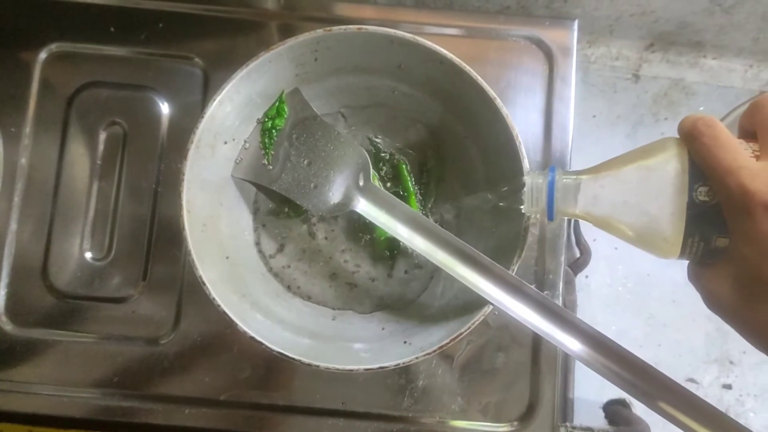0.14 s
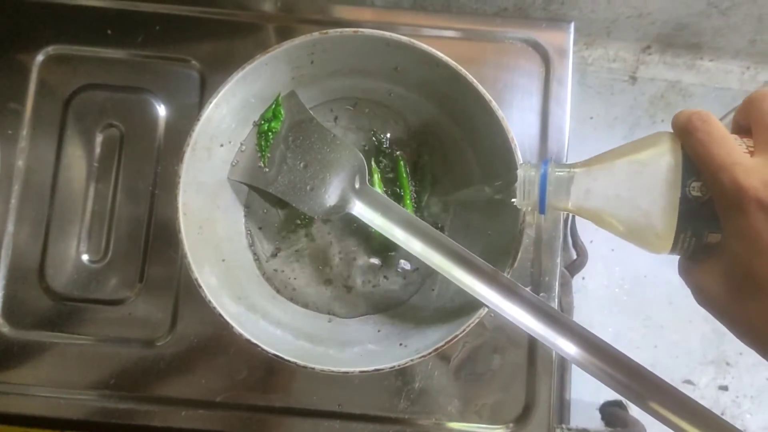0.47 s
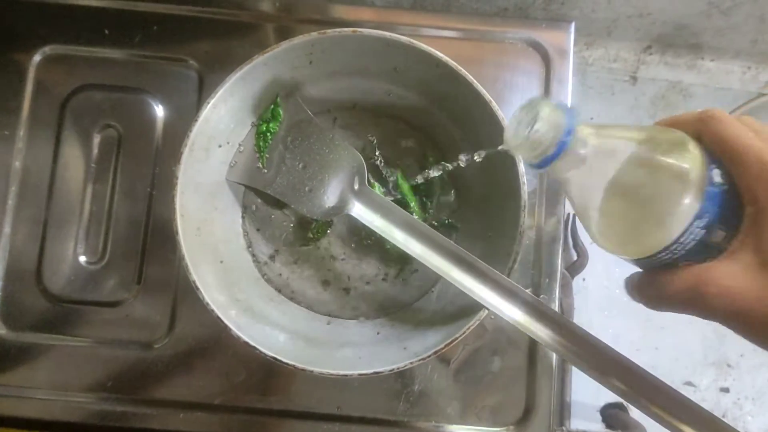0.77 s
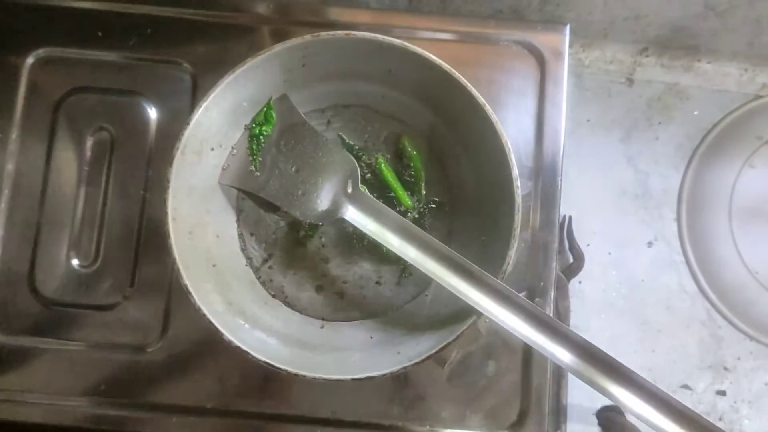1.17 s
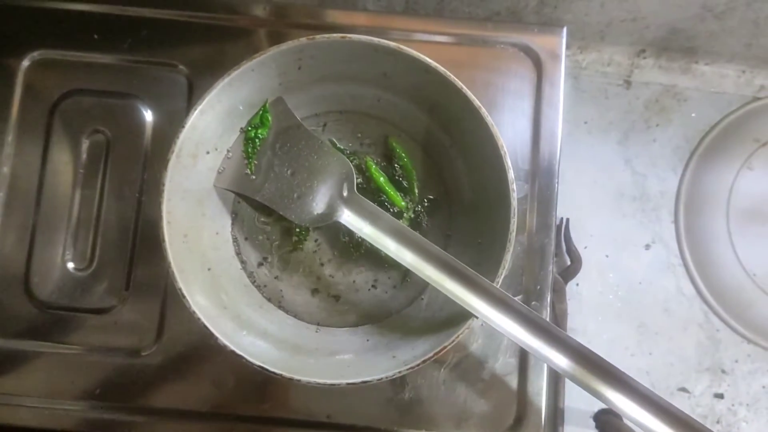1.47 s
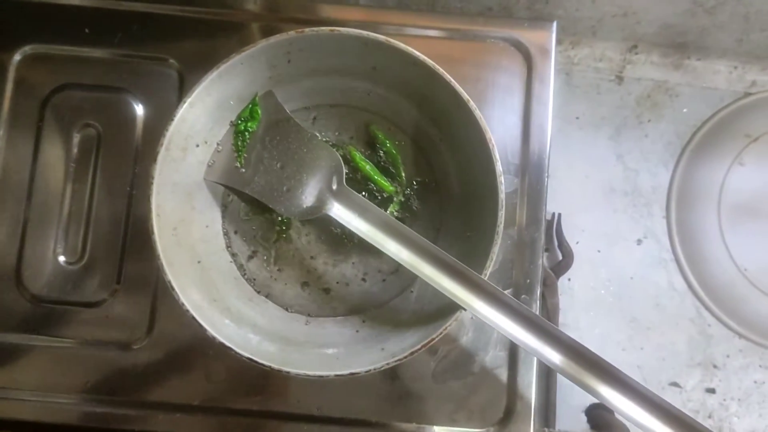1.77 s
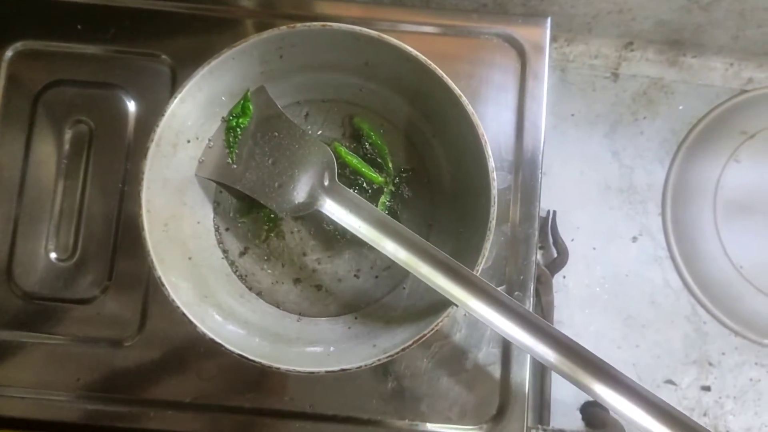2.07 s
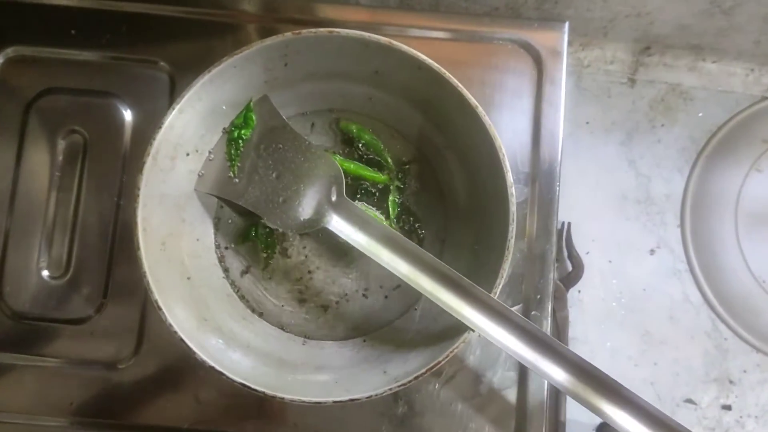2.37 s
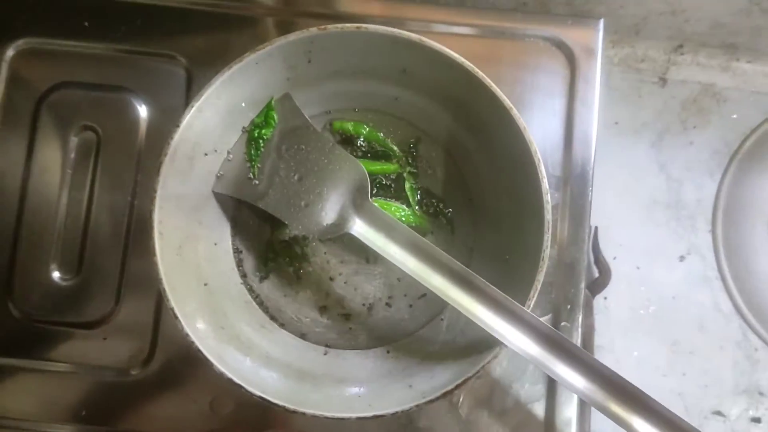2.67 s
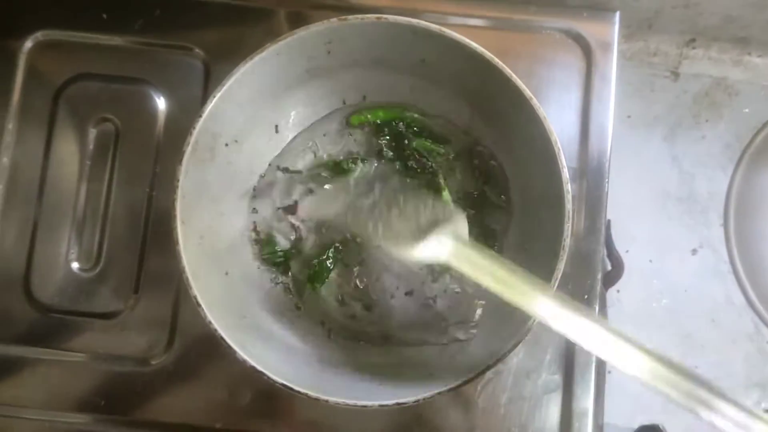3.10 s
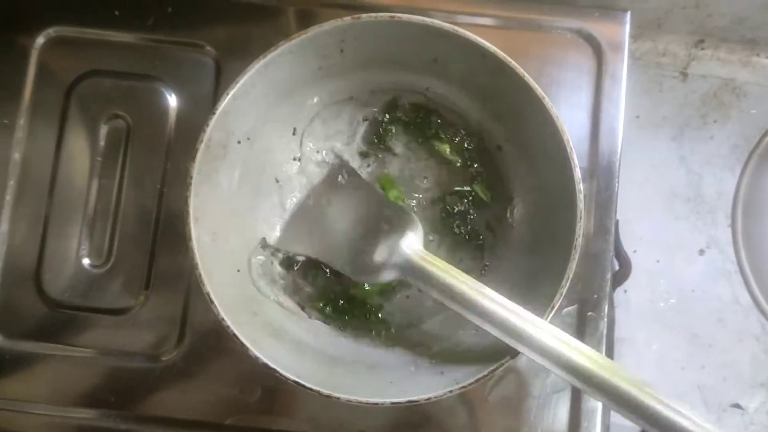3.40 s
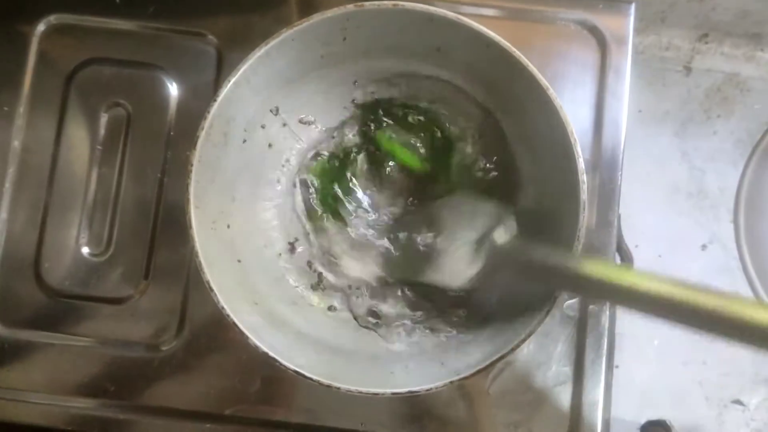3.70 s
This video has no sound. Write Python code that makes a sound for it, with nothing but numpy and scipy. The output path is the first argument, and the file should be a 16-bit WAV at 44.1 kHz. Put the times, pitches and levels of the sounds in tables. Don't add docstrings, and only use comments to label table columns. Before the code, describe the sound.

Hot oil sizzles and spits in a metal pan, calming before a spatula scrapes through it

```python
import sys
import numpy as np
from scipy import signal
from scipy.fft import rfft, irfft
from scipy.io import wavfile

SR = 44100
rng = np.random.default_rng(int(sys.argv[2]) if len(sys.argv) > 2 else 0)


def log_audio(samples):
    frames = np.atleast_2d(samples).T
    limited = np.clip(frames, -1, 1)
    pcm = np.round(limited * 32767).astype(np.int16)
    wavfile.write(sys.argv[1], SR, pcm)


def boost_factor(decibels):
    exponent = np.asarray(decibels, float) / 20
    return 10 ** exponent


N = 169785
BODY_LOW_HZ, BODY_HIGH_HZ = 844, 4346
GRID_HZ = np.fft.rfftfreq(4096, 1 / SR)


def at_hz(points, hz):
    p = np.array(points)
    return np.interp(np.log(hz + 1), np.log(p[:, 0]), p[:, 1])


def rms_one(x):
    return x / np.sqrt(np.mean(np.square(x)) + 1e-20)


def drift(rate_hz):
    r = np.exp(-2 * np.pi * rate_hz / SR)
    wander = signal.lfilter([1], [1, -2 * r, r * r], rng.standard_normal(N + SR))
    return rms_one(wander[SR:])


def colour(x, points):
    cepstrum = irfft(at_hz(points, GRID_HZ) * np.log(10) / 20)
    cepstrum[1:2048] *= 2
    cepstrum[2049:] = 0
    return signal.fftconvolve(x, irfft(np.exp(rfft(cepstrum))))[:N]


def stereo_noise():
    # frequency [Hz], correlation [0 to 1].
    likeness = [(60, 0.6), (400, 0.63), (1000, 0.53), (1700, 0.029), (2700, 1), (3500, 0.045),
                (16000, 0.008)]
    alike = np.clip(at_hz(likeness, np.fft.rfftfreq(N, 1 / SR)), 0, 1)
    mid, side = rfft(rng.standard_normal((2, N)))
    return rms_one(irfft(np.sqrt(1 + alike) * mid + np.sqrt(1 - alike) * side * [[1], [-1]], N))


def band(x, low_hz, high_hz):
    sos = signal.butter(2, [low_hz, high_hz], "band", fs=SR, output="sos")
    return signal.sosfilt(sos, x) * np.sqrt(SR / 2 / (high_hz - low_hz))


def swell(x, rise_s, fall_s):
    a, b = np.exp(-1 / (rise_s * SR)), np.exp(-1 / (fall_s * SR))
    dying = signal.lfilter([1], [1, -b], x + 1e-18)
    return signal.lfilter([2 * (1 - a)], [1, -a], dying)


def arch(s, length_s):
    t = np.arange(N) / SR
    return np.sin(np.pi * np.clip((t - s) / length_s, 0, 1))


def marks(s, db):
    out = np.zeros(N)
    np.add.at(out, (np.asarray(s) * SR).astype(int), boost_factor(np.asarray(db)))
    return out


def grains(per_s, spread_db):
    size = boost_factor(spread_db * np.minimum(rng.exponential(1, N), 4))
    return (rng.random(N) < per_s / SR) * size


def ring(x, hz, t60):
    r, w = boost_factor(-60 / (t60 * SR)), 2 * np.pi * hz / SR
    return signal.lfilter([0, np.sin(w)], [1, -2 * r * np.cos(w), r * r], x + 1e-18)


def boil_strength():
    # time [s], fizz level [dB], bubbling relative to fizz [dB].
    vigour = [(0, -30.5, -1), (.5, -35, -2.5), (.9, -32.5, -3), (1.3, -36.5, -4), (1.43, -40.5, -9.5),
              (1.565, -43, -4), (1.581, -65, -9), (1.595, -35.5, -3), (2.0, -46, -2), (2.3, -47, -1.5),
              (2.6, -65.5, 4.5), (2.95, -79, 6), (3.2, -52, -3.5), (3.42, -57.5, -6), (3.6, -83, -11),
              (3.64, -39.5, -14), (3.85, -30, -4.5)]
    t = np.arange(N) / SR
    s, fizz_db, rel_db = np.transpose(vigour)
    fizz = boost_factor(np.interp(t, s, fizz_db))
    bubbling = boost_factor(np.interp(t, s, fizz_db + rel_db))
    patch = boost_factor(0.5 * (drift(1.3) + drift(44)) / 2)
    grain_s, grain_db = 0.0012, -5.5
    fine, coarse = [boost_factor(grain_db) * swell(grains(230, 2.5), grain_s / 3, grain_s) for _ in range(2)]
    hiss = fizz * boost_factor(-4.5) * patch * (1 + fine)
    wash = bubbling * boost_factor(-9.5) * patch * (1 + 0.27 * fine + 1.41 * coarse)
    return hiss, wash, bubbling


def patchy(x, low_hz, high_hz, patchy_db):
    count, flares_hz = 12, 46
    edges = np.geomspace(low_hz, high_hz, count + 1)
    out = 0
    for k, (a, b) in enumerate(zip(edges, edges[1:])):
        share = np.sqrt((b - a) / (high_hz - low_hz))
        out = out + boost_factor(patchy_db * drift(flares_hz)) * share * band(x[k % 2], a, b)
    return out


def bubbles():
    per_s, cycles, spread_db = 570, 2.15, 6.5
    born = grains(per_s * boost_factor(2.6 * drift(15)), spread_db)
    dealt = rng.integers(0, 24, N)
    out = np.zeros((2, N))
    for k, hz in enumerate(np.geomspace(1000, 3200, num=24)):
        one = ring(born * (dealt == k), hz, cycles / hz)
        out += [one, np.roll(one, rng.integers(-9, 10))]
    return rms_one(out)


def spits():
    # start [s], peak [dB], spray relative to peak [dB].
    early_spits = [(0.161, -4.5, -14), (0.2449, 0.5, -33), (0.2708, -1.5, -23), (0.3024, 5.5, -33),
                   (0.332, -8, -15), (0.4362, -6, -27), (0.5307, -20, -8.5), (0.54, -17, -8.5),
                   (0.6371, -7.5, -30), (0.6574, -5, -22), (0.6844, -18, -7), (0.7643, -4, -16),
                   (0.8145, -20, -18), (0.844, -19.5, -16), (0.858, -10.5, -8), (0.935, -5.5, -21),
                   (1.0064, -6.5, -26), (1.1032, -2, -20.5), (1.189, -6.5, -12), (1.253, -18, -27),
                   (1.2886, -6.5, -39), (1.3362, -10, -31), (1.3788, -17.5, -11), (1.4544, -0.5, -23),
                   (1.4824, -6.5, -20), (1.5728, -16, -35), (1.5892, 4, -27.5), (1.6238, -6, -34),
                   (1.6615, -7, -25.5), (1.825, -9.5, -19)]
    # start [s], peak [dB].
    small_ticks = [(0.0074, -25), (0.0338, -26), (0.0606, -12), (0.1686, -25), (0.1774, -20), (0.1923, -9),
                   (0.2104, -29), (0.224, -17), (0.3444, -25), (0.445, -18), (0.4723, -18), (0.504, -15),
                   (0.7287, -24), (1.3109, -33), (1.3603, -20), (1.3957, -20), (1.4654, -18),
                   (1.4994, -13.5), (1.5203, -12.5), (1.5954, -24), (1.6044, -27), (1.6134, -16),
                   (1.6256, -21), (1.6364, -23), (1.683, -12), (1.6895, -12.5), (1.727, -12), (1.7427, -15),
                   (1.784, -19), (1.8432, -27), (1.9924, -21), (2.0722, -26), (2.081, -23), (2.1675, -21),
                   (2.1982, -21), (2.3974, -37), (2.5656, -42), (2.6534, -44), (2.81, -43), (3.1283, -28),
                   (3.2964, -27), (3.4377, -6), (3.4423, -10), (3.4475, -3), (3.4495, -16), (3.4534, -21),
                   (3.6364, -19), (3.6814, -35), (3.7242, -16.5), (3.7584, -27), (3.7876, -14.5),
                   (3.8093, -15), (3.8174, -17), (3.83, -19), (3.8434, -25)]
    # start [s], peak [dB], body relative [dB], spray relative [dB].
    late_spits = [(1.8986, -9, -23.5, -46), (1.9104, -32, -31, -34), (1.931, -7.5, -26, -22.5),
                  (1.938, -9.5, -17, -26), (2.0112, -12.5, -15, -44), (2.04, -16, -26, -11.5),
                  (2.0904, -24.5, -16.5, -5), (2.105, -7.5, -46, -21), (2.2111, -6, -18, -22.5),
                  (2.2628, -16.5, -28.5, -15), (2.4835, -6, -15.5, -34), (2.5047, -17, -47, -25),
                  (2.633, -23, -8.5, -21.5), (2.8479, -14, -13, -23.5), (2.9766, -17.5, -29, -21),
                  (2.9997, -20, -39, -35), (3.019, -11.5, -8.5, -33), (3.2874, -17, -27, -11.5),
                  (3.5092, -14, -22.5, -13.5), (3.554, -3.5, -20, -31), (3.594, -5.5, -20.5, -23.5),
                  (3.744, -11, -25, -7)]
    usual_body_db, tick_db, tick_spray_db = -20.5, 3.5, -28
    events = [(s, db, usual_body_db, spray_db) for s, db, spray_db in early_spits]
    events += [(s, db + tick_db, usual_body_db, tick_spray_db) for s, db in small_ticks]
    s, db, body_db, spray_db = np.transpose(events + list(late_spits))
    rise_s, crack_fall_s, spray_fall_s = 0.0007, 0.0008, 0.016
    hiss_db, body_db = db - 15.5, db + body_db - 1
    crack = swell(marks(s, hiss_db), rise_s, crack_fall_s)
    crack_body = swell(marks(s, body_db), rise_s, crack_fall_s)
    sputter = boost_factor(5.08 * drift(170))
    spray = sputter * swell(marks(s, hiss_db + spray_db), rise_s, spray_fall_s)
    spray_body = sputter * swell(marks(s, body_db + spray_db), rise_s, spray_fall_s)
    return crack, crack_body, spray, spray_body


def gurgles():
    # start [s], length [s], pitch [Hz], level [dB].
    pockets = [(0.0884, 0.019, 1130, -38), (0.47, 0.0054, 2150, -38), (0.52, 0.041, 1850, -39.5),
               (0.492, 0.11, 1210, -37.5), (0.82, 0.017, 1164, -35), (1.5, 0.014, 1404, -41.5),
               (2.632, 0.0098, 2330, -36.5), (3.308, 0.021, 2270, -38), (3.625, 0.043, 4600, -41.5),
               (3.445, .014, 3300, -23), (3.44, 0.023, 2300, -32), (3.676, 0.017, 3900, -34.5),
               (2.632, .008, 3140, -42), (3.738, 0.019, 4600, -35.5), (3.014, 0.0138, 1000, -37.5),
               (2.1, 0.018, 1000, -41.5), (2.2, 0.013, 500, -44.5), (1.584, 0.0074, 7800, -29),
               (3.67, .02, 2800, -44.5), (3.026, 0.046, 220, -50.5), (3.674, 0.03, 1220, -39.5),
               (4.7, 0.025, 3350, -33.5), (3.5, 0.03, 3800, -34.5)]
    out, jet = np.zeros(N), rng.standard_normal(N)
    for s, length, hz, db in pockets:
        blown = jet * arch(s, length) ** .5
        t60 = min(37 / hz, .07)
        out += boost_factor(db) * ring(blown, hz, t60) * np.sqrt(30 / t60 / SR)
    return out


def spatula_strokes():
    # start [s], length [s], rasp [dB], body [dB], thud [dB].
    blade_strokes = [(2.303, 0.013, -61, -43, -53), (2.366, 0.028, -37, -36, -44.5),
                     (2.425, 0.027, -42, -40, -47.5), (2.556, 0.014, -51, -46, -48),
                     (2.634, 0.0069, -55, -47, -68), (2.685, 0.016, -45.5, -47, -29.5),
                     (2.855, 0.032, -40.5, -51.5, -52), (3.012, 0.01, -21.5, -30.5, -33.5),
                     (3.041, 0.056, -47, -57, -64), (3.074, 0.053, -41.5, -45, -52.5),
                     (3.159, 0.054, -44.5, -52.5, -57.5), (3.289, 0.0094, -48, -50, -49),
                     (3.307, 0.016, -33, -46.5, -35.5), (3.4348, 0.015, -19, -27.5, -27.5),
                     (3.455, 0.055, -43.5, -48, -50), (3.621, 0.041, -32.5, -42, -43.5),
                     (3.66, 0.058, -56, -42.5, -50), (3.719, 0.059, -35.5, -40.5, -51)]
    t = np.arange(N) / SR
    pressed = np.zeros((3, N))
    for s, length, *db in blade_strokes:
        pressed += ((t > s) & (t < s + length)) * boost_factor(db)[:, None]
    rise_s, fall_s = 0.0011, 0.0084
    rasp, body, thud = swell(pressed, rise_s, fall_s) / (2 * fall_s * SR) * boost_factor(3 * drift(107))
    return rasp, body, thud


def judders():
    # start [s], length [s], slips per second [Hz], level [dB].
    blade_judders = [
        (2.693, 0.016, 328, -24.5),
        (3.313, 0.023, 378, -41),
        (3.438, 0.023, 244, -38),
        (3.628, .025, 302, -44),
    ]
    t = np.arange(N) / SR
    out = np.zeros(N)
    for s, length, hz, db in blade_judders:
        for k in range(3):
            partial = np.sin(2 * np.pi * (k + 1) * hz * (t - s))
            out += boost_factor(db - 3.5 * k) * arch(s, length) * partial
    return out


def pan_rings():
    # frequency [Hz], level [dB], t60 [s].
    pan_modes = [(328, 0, .09), (473, -1, 0.23), (900, -7, 1.8), (1647, -3, 2), (2630, -5, 0.22),
                 (3740, -16, 1)]
    # start [s], level [dB].
    pan_knocks = [
        (3.318, -50.5),
        (3.439, -55),
    ]
    s, db = np.transpose(pan_knocks)
    out = np.zeros(N)
    for hz, level_db, t60 in pan_modes:
        out += ring(marks(s, db + level_db + rng.normal(0, 1.1, len(s))), hz, t60)
    return out


def kitchen(x):
    t = np.arange(SR // 4) / SR
    t60 = .09
    cloud = rng.standard_normal((2, len(t))) * boost_factor(-60 * t / t60) * (t > .003)
    return boost_factor(-20) * signal.fftconvolve(x, cloud / np.linalg.norm(cloud[0]), axes=1)[:, :N]


def background():
    # frequency [Hz], level [dB].
    flame_colour = [(20, -13), (45, -8), (62, -0.5), (85, -12), (300, -14.5), (900, -27)]
    # frequency [Hz], level [dB].
    room_colour = [(150, -8), (400, 5), (800, 21), (16000, -99)]
    flame = rms_one([colour(c, flame_colour) for c in stereo_noise()])
    ease_db = -7.5 / (1 + np.exp((2.25 - np.arange(N) / SR) / 0.03))
    hum = rms_one(band(stereo_noise(), 439, 451))
    air = rms_one([colour(c, room_colour) for c in stereo_noise()])
    return boost_factor(-47 + ease_db) * flame + boost_factor(-66) * hum + boost_factor(-67) * air


def scene():
    hiss, wash, bubbling = boil_strength()
    crack, crack_body, spray, spray_body = spits()
    rasp, stroke_body, thud = spatula_strokes()
    body = np.hypot(wash, stroke_body)
    noise = np.array([stereo_noise(), stereo_noise()])
    even = np.sign(stereo_noise())

    pan = patchy(np.hypot(hiss, spray) * noise, BODY_HIGH_HZ, 18800, patchy_db=2)
    pan = pan + patchy(np.hypot(body, spray_body) * noise, BODY_LOW_HZ, BODY_HIGH_HZ, patchy_db=3)
    pan += boost_factor(-11.5) * bubbling * bubbles()
    pan += band(crack * even, BODY_HIGH_HZ, 14800)
    pan += band(crack_body * even, 686, BODY_HIGH_HZ)
    pan += gurgles()
    pan += boost_factor(-4) * band(rasp * noise[1], BODY_HIGH_HZ, 9600)
    pan += boost_factor(-8) * band(rasp * noise[0], BODY_HIGH_HZ, 16000)
    pan += boost_factor(-6) * band(band(thud * even, 170, 860), 170, BODY_HIGH_HZ)
    pan += judders() + pan_rings()
    return pan + kitchen(pan) + background()


def roll_off(x):
    return signal.sosfilt(signal.butter(12, 16300, fs=SR, output="sos"), x)


def record(dry):
    # frequency [Hz], gain [dB].
    left_port = [(200, -2.5), (600, -7.5), (2900, 5.5), (3800, 0), (6400, -2.5), (8900, 8.5), (10500, -8),
                 (16000, -4.5)]
    # frequency [Hz], gain [dB].
    right_port = [(200, -5), (600, -5.5), (2800, -3), (3700, -3), (6300, 3), (7800, 16), (10000, -5),
                  (16000, -13)]
    heard = np.array([colour(dry[0], left_port), colour(dry[1], right_port)])
    heard = signal.sosfilt(signal.cheby2(10, 30, 16200, fs=SR, output="sos"), heard)
    return roll_off(heard)


dry = scene()
out = record(dry)
log_audio(out)
```